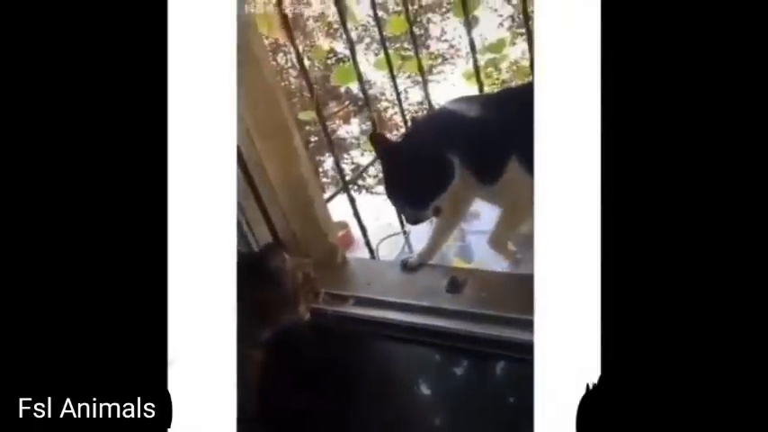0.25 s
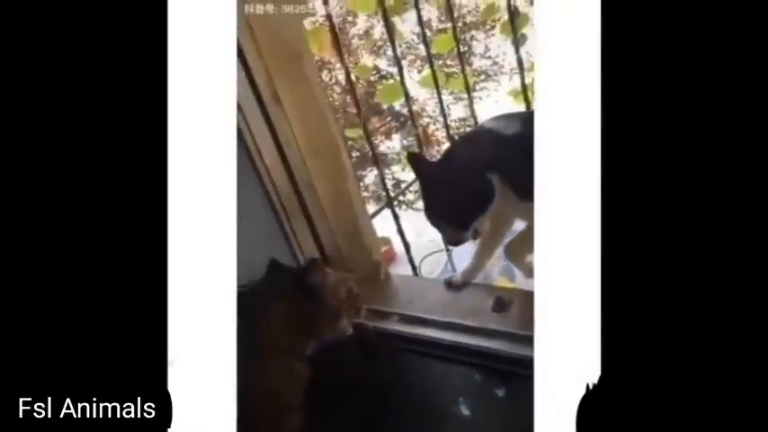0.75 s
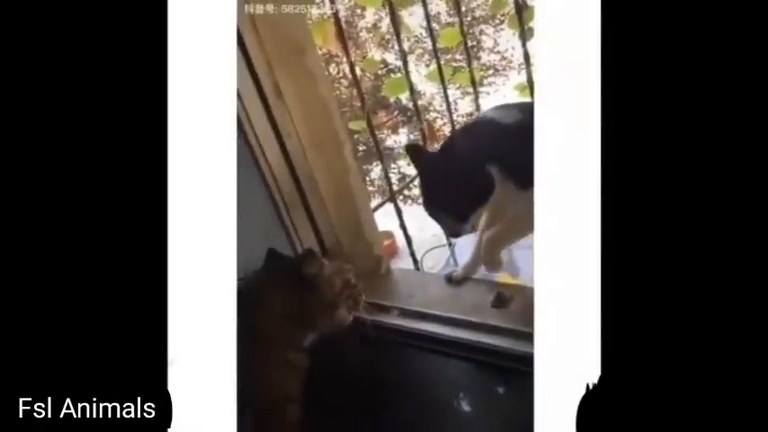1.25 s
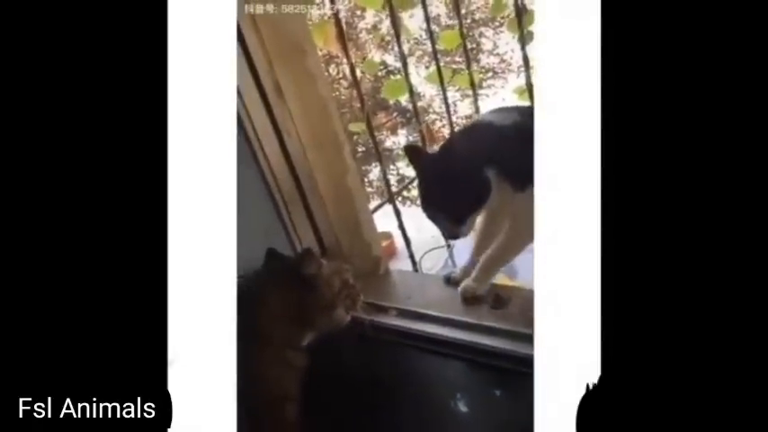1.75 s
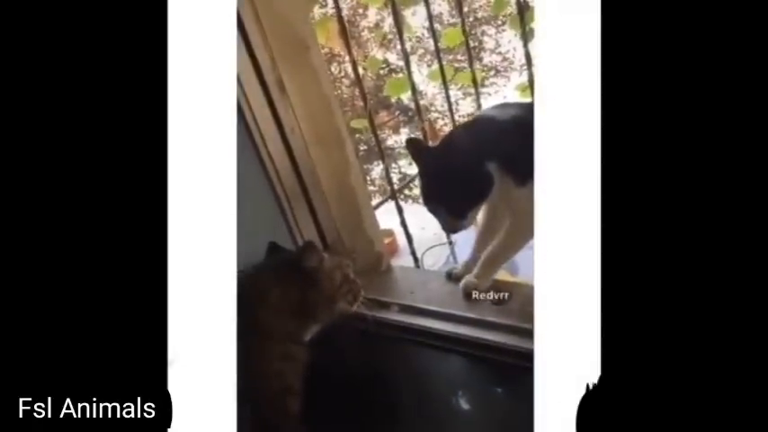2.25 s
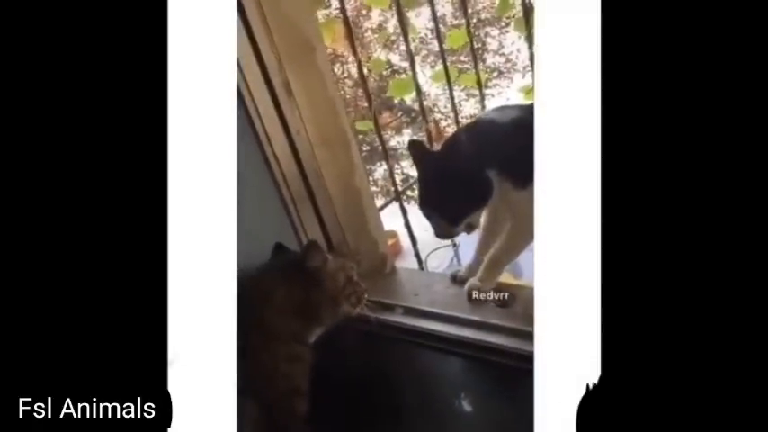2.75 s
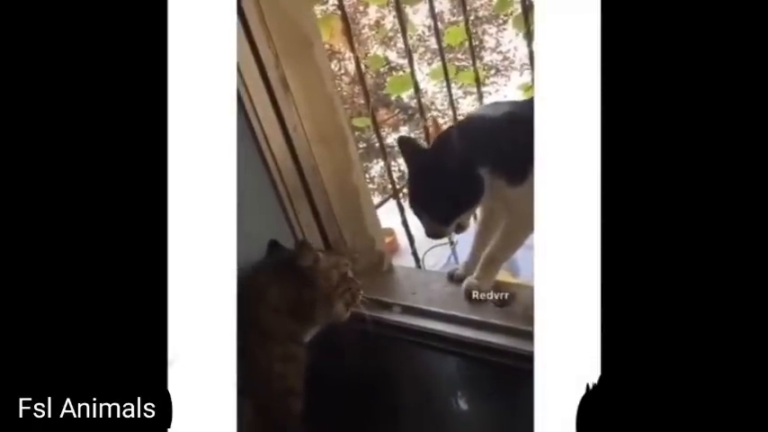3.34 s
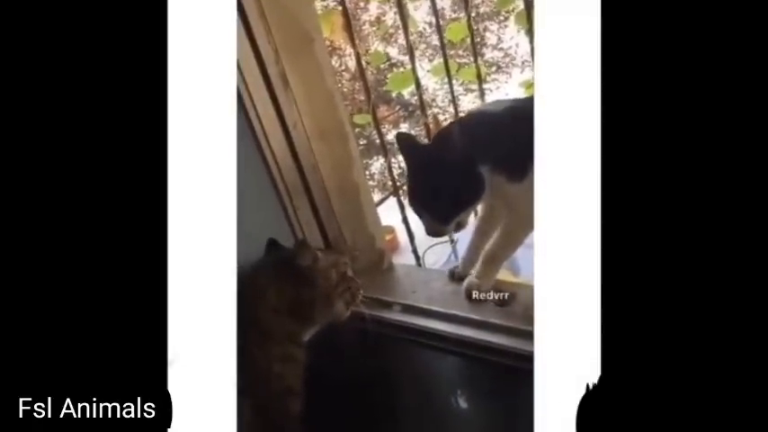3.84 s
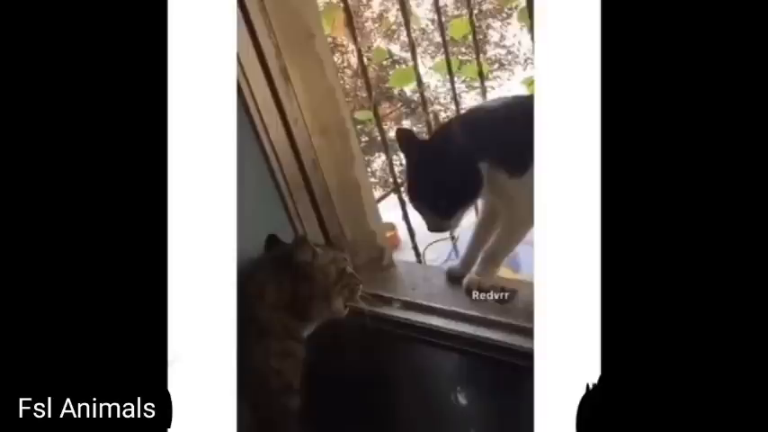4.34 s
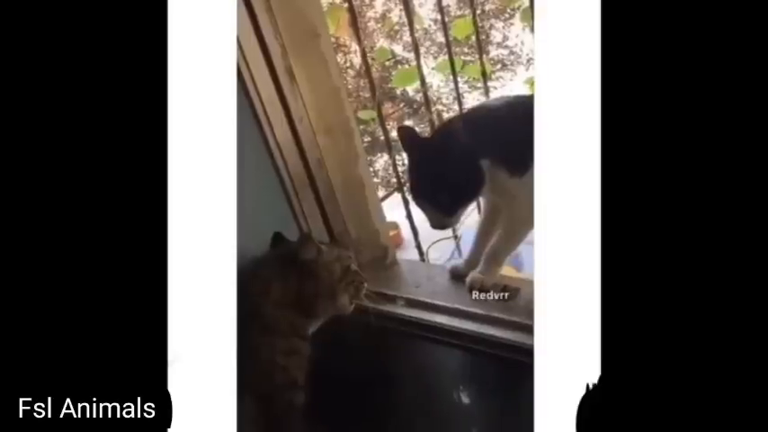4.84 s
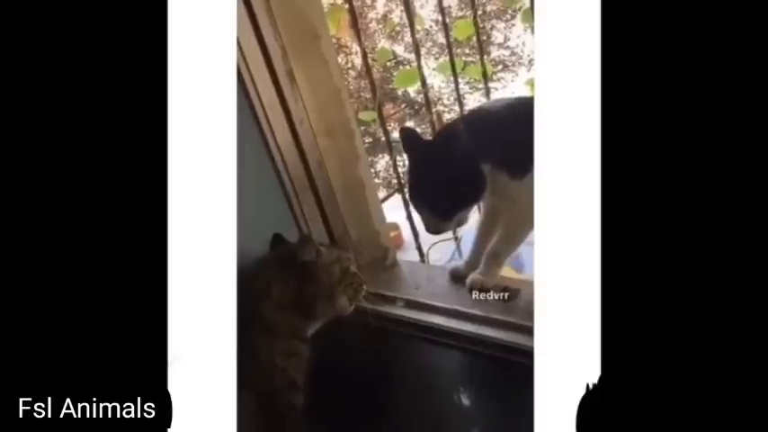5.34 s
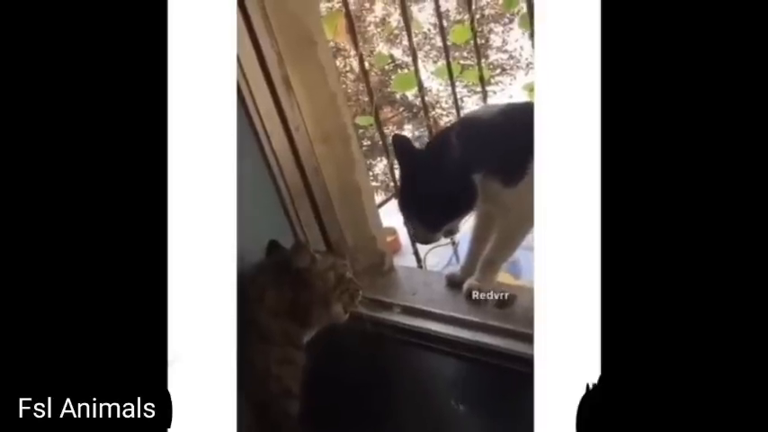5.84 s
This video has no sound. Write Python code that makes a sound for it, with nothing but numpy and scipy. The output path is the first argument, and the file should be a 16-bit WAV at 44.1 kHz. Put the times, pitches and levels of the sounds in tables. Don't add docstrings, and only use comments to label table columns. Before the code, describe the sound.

Loud, clear, nasal cat yowls dominate, each gliding in pitch and stopping abruptly. A second, lower and quieter cat moans below with a growling roughness that comes and goes. Between the wails there are faint clicks of lips and claws. The sound is close, with a short bright indoor reverberation and soft low traffic rumble from the window; the last two cries are cut off mid-call.

```python
import sys
import numpy as np
from scipy import signal
from scipy.fft import rfft, irfft
from scipy.io import wavfile
from scipy.ndimage import uniform_filter1d

SR = 44100
rng = np.random.default_rng(int(sys.argv[2]) if len(sys.argv) > 2 else 0)


def store_pcm(level_fs):
    pcm = np.round(np.clip(level_fs, -1, 1) * 32767).astype(np.int16)
    wavfile.write(sys.argv[1], SR, np.atleast_2d(pcm).T)


def gain_from_db(level_db):
    decades = np.asarray(level_db, float) / 20
    return 10 ** decades


N = 268128

SWAY_DB = 1.6

JAW_WIDTH_HZ, JAW_DB = 302, -2.5
# (centre [Hz], width [Hz], level [dB])
HIGH_TRACT = [
    (1633, 314, -1.5),
    (2396, 440, -1.5),
]
WIDEST_PITCH_HZ = 610


def high_low_partial(k, pitch, jaw_hz, lips_db):
    tract = gain_from_db(-19) * (k == 1)
    tract = tract + gain_from_db(JAW_DB) * hump(k * pitch, jaw_hz, JAW_WIDTH_HZ) ** 1.62
    relative_hz = k * pitch * (WIDEST_PITCH_HZ / pitch) ** 0.12
    for hz, width_hz, db in HIGH_TRACT:
        tract += gain_from_db(db + lips_db) * hump(relative_hz, hz, width_hz) ** 1.017
    source_db = -0.5 * (k - 3.5)
    sway_db = SWAY_DB * drift(len(pitch), rate_hz=4.9) + 0.23 * drift(len(pitch), rate_hz=6.7)
    return tract * gain_from_db(source_db + sway_db)


# (frequency [Hz], clean line [dB], hiss around it [dB])
HIGH_UPPER = [(2900, -24.5, -44), (3260, -20, -30.5), (3683, -33, -58), (4130, -48, -65), (4900, -41, -48),
              (5570, -39.5, -58), (6500, -36.5, -49), (6400, -45.5, -44), (7560, -37.5, -54),
              (8800, -62, -46.5), (10200, -64.5, -54), (11800, -58, -58.5), (12500, -69, -58)]


def high_upper_partial(k, widened, edge_db, airy_db):
    upper_hz, line_db, hiss_db = np.transpose(HIGH_UPPER)
    line_db = np.interp(k * widened, upper_hz, line_db) + edge_db
    line = gain_from_db(line_db + 3.35 * drift(len(widened), rate_hz=2.8))
    hiss = gain_from_db(np.interp(k * widened, upper_hz, hiss_db) + airy_db)
    return line + hiss * drift(len(widened), rate_hz=160)


# (time [s], pitch [Hz], effort [dB], first mouth resonance [Hz], lips open on the next two [dB])
HIGH_WAILS = [
    [(0.0, 647.3, -19.5, 1310, 1.5), (0.3, 625.9, -20.5, 1220, 1.5), (0.55, 602.9, -21, 1270, 1.5),
     (0.8, 578.2, -18, 1225, -8.5), (1.1, 545.4, -18.5, 1178, -6.5), (1.45, 501, -18.5, 1060, -14.5),
     (1.6, 472, -20.5, 1030, -19.5), (1.75, 421.4, -24.5, 930, -18.5), (1.805, 400, -34, 878, -18)],
    [(2.395, 406, -35, 886, -21), (2.44, 420.8, -23, 919, 0), (2.6, 534, -16.5, 1012, -6),
     (2.75, 589.6, -20, 1110, -0.5), (2.92, 614.9, -20, 980, 2), (3.4, 592.8, -18, 1054, -4.5),
     (3.93, 542.3, -23.5, 1022, 1.5), (4.25, 476.2, -23.5, 1036, -7), (4.47, 390.3, -26.5, 957, -16)],
    [(5.1, 411, -24.5, 1010, 3), (5.2, 433.3, -21.5, 1015, -13.5), (5.43, 522, -21, 980, 1),
     (5.65, 580.4, -21, 960, -0.5), (5.85, 599.6, -23.5, 1057, 2), (6.08, 588.5, -19.5, 960, -1.5)],
]
# (clean edge [dB], hiss [dB], shift of the far resonances [octaves])
HIGH_EDGE = [
    (-2, 2.5, .04),
    (-2.5, -0.5, 0.009),
    (-0.5, -1.5, .06),
]
# (frequency [Hz], density [dB per Hz])
HIGH_BREATH = [(300, -42.5), (1200, 13), (2400, 10), (2800, -37), (4000, -42), (12500, -68.5)]
SAG, SAG_S = 0.2, 0.025


def high_cat():
    out = np.zeros(N)
    for rows, (edge_db, airy_db, shift) in zip(HIGH_WAILS, HIGH_EDGE):
        span, (pitch, effort_db, jaw_hz, lips_db) = columns(rows)
        if span[-1] < N - 200:
            pitch = pitch * (1 - SAG * np.exp((span - span[-1]) / SR / SAG_S))
        jitter = 0.0025 * drift(len(span), rate_hz=46.0)
        turn = 2 * np.pi * np.cumsum(pitch * (1 + jitter)) / SR
        effort = gain_from_db(effort_db)
        breath = gain_from_db(-35) * effort * coloured(HIGH_BREATH, N)[span]
        voice = breath * (1 + 0.2 * np.cos(turn))
        bloom = gate(span, attack_s=0.087, release_s=0.03)
        widened = pitch * (WIDEST_PITCH_HZ / pitch) ** 0.75 * 2 ** shift
        for k in range(1, 27):
            if k < 5:
                level = effort * high_low_partial(k, pitch, jaw_hz, lips_db)
            else:
                upper = high_upper_partial(k, widened, edge_db, airy_db)
                level = effort * gain_from_db(0.33 * lips_db) * bloom * upper
            voice += np.sqrt(2) * level * np.cos(k * turn + rng.uniform(0, 2 * np.pi))
        out[span] = voice * gate(span, attack_s=0.0058, release_s=0.032)
    return out


# (start [s], length [s], half partials against whole ones [dB])
DOUBLING = [
    (0.096, 0.11, -1),
    (1.753, .4, -24),
    (2.206, .05, 14.5),
    (2.96, .08, -9),
    (3.287, 0.22, -9.5),
    (3.602, 0.788, 1),
    (4.398, .45, -9),
    (4.939, .18, 2),
    (5.28, 0.46, -10),
    (5.666, 0.39, 0.5),
]
REGULAR_DB, SLIP_S = -22.5, 0.049


def doubling(span):
    share = gain_from_db(REGULAR_DB)
    for start_s, length_s, db in DOUBLING:
        inside_s = np.minimum(span / SR - start_s, start_s + length_s - span / SR)
        share = share + gain_from_db(db) * np.clip(inside_s / SLIP_S + 0.5, 0, 1)
    return 20 * np.log10(share)


# (centre [Hz], width [Hz], level against the mouth at the top of its range [dB])
LOW_UPPER = [
    (2400, 350, -12),
    (4800, 500, -38),
    (3000, 400, -12),
    (3550, 400, -12),
]
MOUTH_WIDTH_HZ, MOUTH_SKIRT_HZ, MOUTH_SKIRT_DB = 280, 706, -0.5
THROAT_HZ, THROAT_WIDTH_HZ = 960, 640
LOW_FIRST_DB, LOW_THROAT_DB = -46, -40.5


def low_tract(halves, pitch, chest_db, mouth_db, mouth_hz):
    hz = halves / 2 * pitch
    level = gain_from_db(LOW_FIRST_DB + chest_db) * (halves < 4) * hump(hz, pitch, width_hz=300.0)
    level += gain_from_db(LOW_THROAT_DB + chest_db) * hump(hz, THROAT_HZ, THROAT_WIDTH_HZ) ** 1.91
    upper = [gain_from_db(db) * hump(hz, centre_hz, width_hz) ** 0.91 for centre_hz, width_hz, db in LOW_UPPER]
    mouth = hump(hz, mouth_hz, MOUTH_WIDTH_HZ) ** 7.2
    mouth += gain_from_db(MOUTH_SKIRT_DB) * hump(hz, mouth_hz, MOUTH_SKIRT_HZ) ** 2
    strain = np.minimum(gain_from_db(50 * np.log2(pitch / 445)), 1)
    return level + gain_from_db(mouth_db) * (mouth + sum(upper[:2]) + strain * sum(upper[2:]))


# (time [s], pitch [Hz], mouth level [dB], mouth
# resonance [Hz])
LOW_MOANS = [
    [(0.0, 443, -24.5, 1910), (0.2, 455.7, -29, 2014), (0.62, 405.8, -27.5, 1968),
     (0.93, 393.8, -30.5, 1946), (1.27, 343.8, -32.5, 1700), (1.6, 335.5, -32.5, 1770),
     (2.08, 321.4, -30.5, 1767), (2.18, 290, -39, 1531), (2.235, 218, -69.5, 1312)],
    [(2.9, 469, -65, 1210), (2.95, 378, -33.5, 1230), (3.0, 339.5, -50, 1230), (3.2, 373, -53.5, 1496)],
    [(3.2, 329, -41, 1540), (3.34, 342, -38.5, 1870), (3.7, 356.9, -44.5, 1726), (4.1, 381.5, -42, 1727),
     (4.28, 381.3, -40.5, 2214), (4.5, 350.7, -31.5, 1897), (4.75, 335, -32.5, 1884),
     (4.93, 323.2, -31, 1667)],
    [(4.93, 335, -32.5, 1640), (5.03, 350.8, -38, 1770), (5.2, 338, -32, 1736), (5.4, 323.9, -33.5, 1695),
     (5.62, 319.2, -42, 1845), (5.87, 338.3, -40.5, 1826), (6.08, 333, -47, 1930)],
]
CHEST_DB = [-2.5, -4, -2, -2]
CHEST_FOLLOWS = 0.45
# (frequency [Hz], density [dB per Hz])
LOW_BREATH = [(500, -33), (1800, 6.5), (2550, -7), (2800, -5), (3600, -4), (4100, -20), (5000, -10),
              (7000, -21.5), (9000, -30), (12500, -28)]


def low_cat():
    out = np.zeros(N)
    for rows, share_db in zip(LOW_MOANS, CHEST_DB):
        span, (pitch, mouth_db, mouth_hz) = columns(rows)
        chest_db = share_db + CHEST_FOLLOWS * (mouth_db + 34)
        half_db = doubling(span)
        uneven = np.minimum(gain_from_db(half_db), 1)
        jitter = (0.0029 + 0.0066 * uneven) * drift(len(span), rate_hz=60.0)
        wander = 0.004 * drift(len(span), rate_hz=5)
        turn = 2 * np.pi * np.cumsum(pitch * (1 + jitter + wander)) / SR
        breath = gain_from_db(mouth_db - 23.5) * coloured(LOW_BREATH, N)[span]
        voice = breath * (1 + 0.17 * np.cos(turn))
        for halves in range(1, 37):
            level = low_tract(halves, pitch, chest_db, mouth_db, mouth_hz)
            level *= gain_from_db(0.62 * SWAY_DB * drift(len(span), rate_hz=9.0))
            if halves % 2:
                level *= gain_from_db(half_db - 6.1 * (halves == 1))
            blur = (0.2 + 0.22 * uneven) * min(halves / 10, 1.5)
            rasp = 1 + blur * drift(len(span), rate_hz=70.0)
            voice += np.sqrt(2) * level * rasp * np.cos(halves / 2 * turn + rng.uniform(0, 2 * np.pi))
        out[span] = voice * gate(span, attack_s=0.0067, release_s=0.0066)
    return out


# (time [s], peak
# level [dB], ring [Hz], decay [s])
TICKS = [(2.138, -51.5, 4900, 0.026), (2.286, -46.5, 5740, 0.0015), (2.296, -61, 5900, 0.0042),
         (2.307, -52, 3300, 0.0037), (2.335, -52, 3300, 0.0022), (2.405, -53, 6100, 0.011),
         (4.369, -60, 7600, 0.01), (4.748, -52, 4700, 0.0077), (4.795, -56, 7250, 0.0035),
         (4.994, -48.5, 4700, 0.0036), (5.002, -51, 7100, 0.0042), (5.188, -43, 3900, 0.0071)]


def ticks():
    out, t = np.zeros(N), np.arange(4000) / SR
    for s, db, hz, decay_s in TICKS:
        puff = rng.standard_normal(4000) * t * np.exp(-t / decay_s)
        hollow = signal.butter(2, [0.9 * hz, 1.11 * hz], "band", fs=SR, output="sos")
        ring = signal.sosfilt(hollow, puff)
        start = round(s * SR)
        out[start:start + 4000] += gain_from_db(db) * ring / np.abs(ring).max()
    return out


# (frequency [Hz], reverberation time T60 [s])
ROOM_T60 = [(200, 0.64), (1000, 0.46), (2500, 0.37), (5000, 0.12), (10000, 0.84)]


def room(x):
    t, tail = np.arange(SR // 2) / SR, 0
    for low in 100 * 2. ** np.arange(7):
        octave = signal.butter(2, [low, 2 * low], "band", fs=SR, output="sos")
        band = signal.sosfilt(octave, rng.standard_normal(len(t)))
        decay = gain_from_db(-60 * t / at_log(ROOM_T60, low * np.sqrt(2)))
        tail = tail + band * decay * (t > 0.004)
    tail /= np.sqrt(np.sum(tail ** 2))
    return signal.fftconvolve(x, tail)[:N]


# (frequency [Hz], density [dB per Hz])
AIR = [(25, -38.5), (57, 6), (80, -7.5), (110, 4.5), (140, -10), (180, 1), (260, -10), (600, -7),
       (1500, -4.5), (3000, -26), (7000, -31), (12000, -39)]


def street_air():
    return gain_from_db(-55 + 2.2 * drift(N, rate_hz=2.5)) * coloured(AIR, N)


def rms_one(x):
    return x / np.sqrt(np.mean(x ** 2) + 1e-20)


def at_log(points, x):
    hz, value = np.transpose(points)
    return np.interp(np.log(x), np.log(hz), value)


def columns(rows):
    s, *curves = np.transpose(rows)
    span = np.arange(max(0, round(s[0] * SR)), min(N, round(s[-1] * SR)))
    i = np.clip(np.searchsorted(s, span / SR) - 1, 0, len(s) - 2)
    step = np.diff(s)[i]
    u = (span / SR - s[i]) / step
    out = []
    for c in curves:
        slope = np.pad(np.diff(c) / np.diff(s), 1, mode="edge")
        a, b = slope[:-1], slope[1:]
        m = np.where(a * b > 0, 2 * a * b / (a + b + 1e-12), 0)
        rise = np.diff(c)[i]
        bend = (1 - u) * (m[i] * step - rise) - u * (m[i + 1] * step - rise)
        out.append(c[i] + u * rise + u * (1 - u) * bend)
    return span, out


def drift(size, rate_hz):
    r = np.exp(-2 * np.pi * rate_hz / SR)
    noise = rng.standard_normal(size + 8000)
    return rms_one(signal.lfilter([1], [1, -2 * r, r * r], noise)[8000:])


def coloured(spectrum, size):
    hz = np.maximum(np.fft.rfftfreq(size, 1 / SR), 10)
    return rms_one(irfft(rfft(rng.standard_normal(size)) * gain_from_db(at_log(spectrum, hz)), size))


def gate(span, attack_s, release_s):
    rise = (span - span[0]) / SR / attack_s if span[0] > 0 else 1
    fall = (span[-1] - span) / SR / release_s if span[-1] < N - 200 else 1
    return np.clip(np.minimum(rise, fall), 0, 1)


def hump(hz, centre_hz, width_hz):
    return 1 / (1 + (2 * (hz - centre_hz) / width_hz) ** 2)


def scene():
    near = high_cat() + low_cat() + ticks()
    air = street_air()
    return (near + gain_from_db(-7) * room(near) + air)[None]


HOLE_DB, HOLE_DB_PER_KHZ = -37, -11
FRAME_HOLE_DB = -70


def hollowed(x):
    hz, _, cells = signal.stft(x, SR, nperseg=1024)
    power = uniform_filter1d(np.abs(cells) ** 2, size=4, axis=1)
    distance_khz = np.abs(hz[:, None] - hz) / 1000
    spread = gain_from_db(HOLE_DB + HOLE_DB_PER_KHZ * distance_khz) ** 2
    threshold = spread @ power + gain_from_db(FRAME_HOLE_DB) ** 2 * power.sum(axis=0)
    heard = (uniform_filter1d(power, size=5, axis=0) > threshold) | (hz[:, None] < 1200)
    return signal.istft(cells * heard, SR, nperseg=1024)[1][:N]


def roll_off(x):
    return signal.sosfilt(signal.butter(12, 12425, fs=SR, output="sos"), x)


def record(dry):
    rounded = dry[0] / (1 + (np.abs(dry[0]) / 0.64) ** 4) ** 0.25
    return roll_off(hollowed(rounded)[None])


dry = scene()
out = record(dry)
store_pcm(out)
```